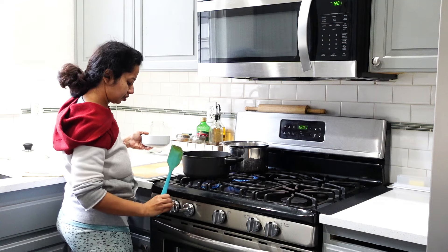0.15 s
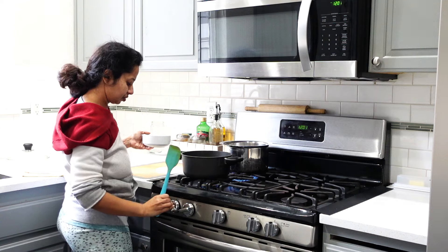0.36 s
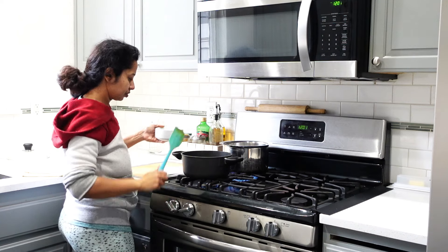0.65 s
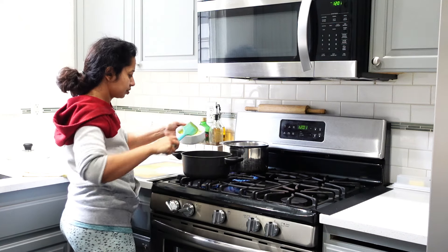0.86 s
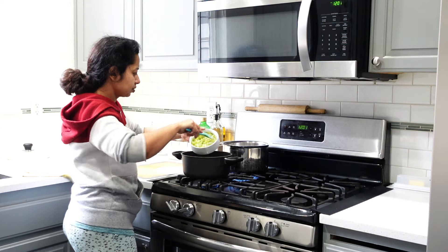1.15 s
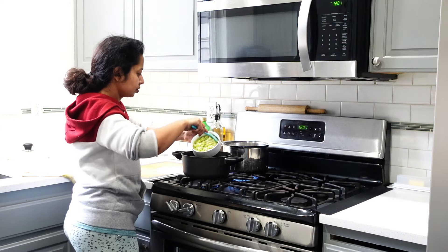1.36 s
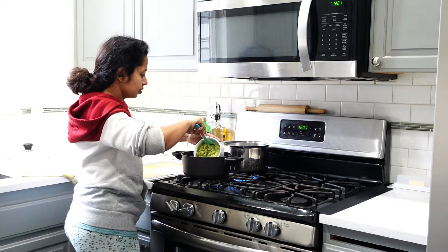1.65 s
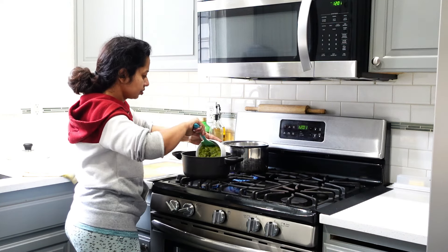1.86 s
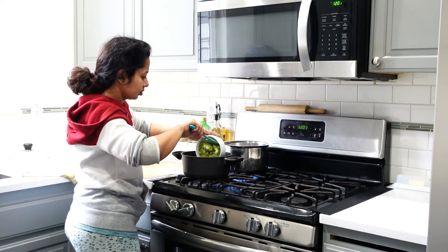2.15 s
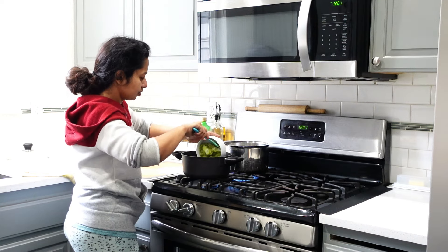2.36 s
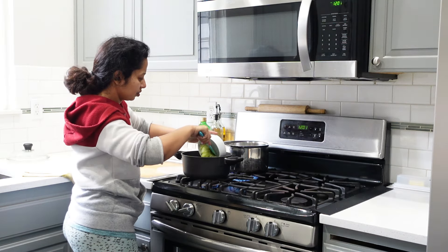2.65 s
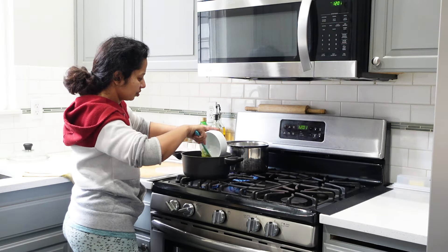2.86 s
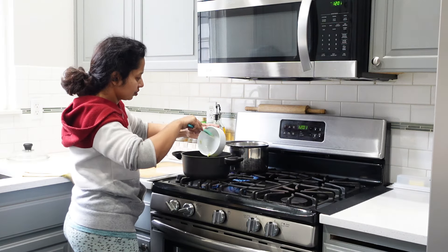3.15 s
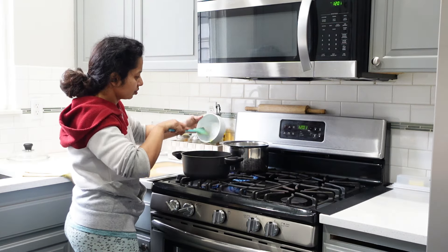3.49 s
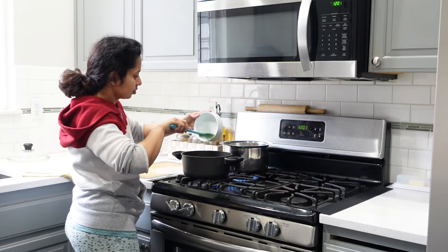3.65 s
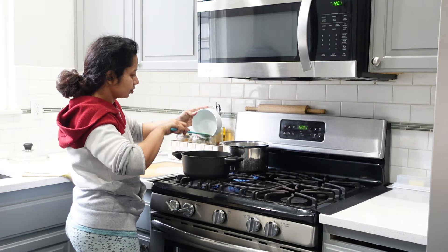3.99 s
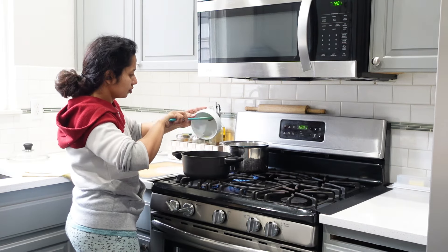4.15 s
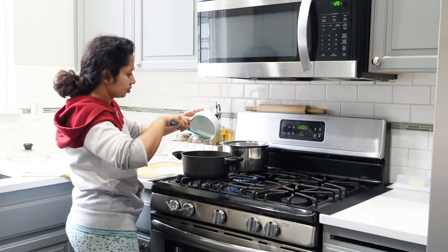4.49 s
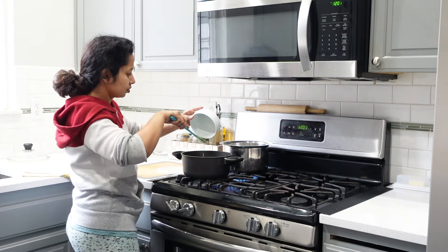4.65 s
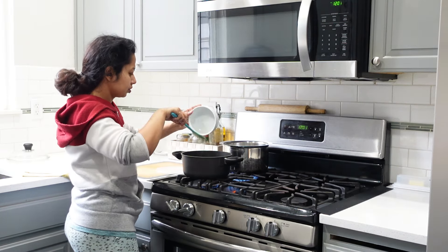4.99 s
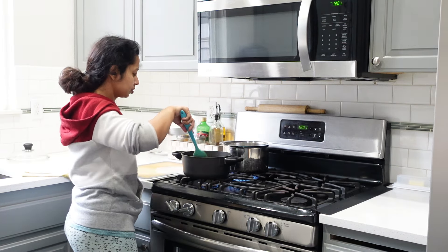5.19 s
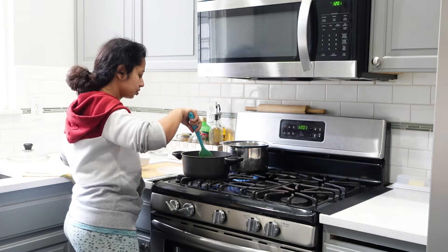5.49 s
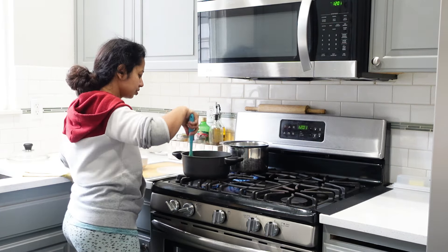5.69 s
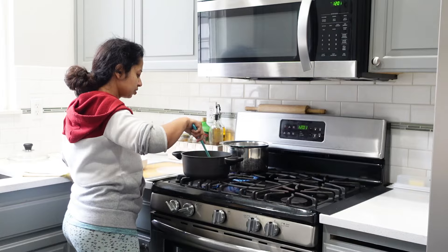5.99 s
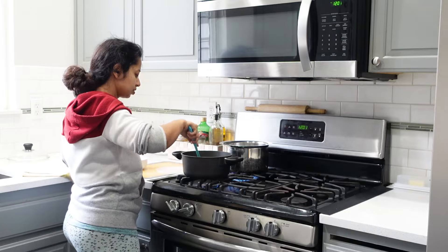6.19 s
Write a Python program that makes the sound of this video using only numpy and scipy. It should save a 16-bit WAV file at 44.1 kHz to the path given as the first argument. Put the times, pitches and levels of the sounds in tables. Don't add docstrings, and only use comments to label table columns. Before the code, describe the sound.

Vegetables fry in a deep pot, crackling brightly, then cutting suddenly to a softer, wetter hiss that grows lively under a spatula in a tiled kitchen.

```python
import sys
import numpy as np
from scipy import signal
from scipy.fft import rfft, irfft, next_fast_len
from scipy.io import wavfile
from scipy.ndimage import uniform_filter1d

SR = 44100
rng = np.random.default_rng(int(sys.argv[2]) if len(sys.argv) > 2 else 0)


def transcribe(signal):
    frames = np.atleast_2d(signal).T
    limited = np.clip(frames, -1, 1)
    pcm = np.round(limited * 32767).astype(np.int16)
    wavfile.write(sys.argv[1], SR, pcm)


def to_linear_factor(level_db):
    exponent = np.asarray(level_db, float) / 20
    return 10 ** exponent


N = 279241
CUT_S = 2.5645
CUT_SAMPLE = round(CUT_S * SR)
STEP = 40
CONTROL_SAMPLES = np.arange(N // STEP + 2) * STEP
CONTROL_S = CONTROL_SAMPLES / SR
AFTER_CUT = CONTROL_SAMPLES >= CUT_SAMPLE

# frequency in Hz, width in Hz, level over the hiss before the cut in dB,
# level over it after the cut in dB.
POT_MODES = [(704, 26, 5, 18.5), (853, 30, 0, 10), (935, 40, 2, 0), (1090, 90, 3, 0), (1230, 80, 0, 9),
             (1340, 65, 10, 12.5), (1555, 90, 3, 6), (1948, 110, -2, 7.5), (2150, 90, 3, 6),
             (2570, 70, 3, 6), (2930, 130, 7, 3), (3460, 80, 4, -1), (3885, 100, 4, 5), (4310, 120, 0, -1),
             (4725, 80, 5, 0), (5350, 90, 4, 0), (5670, 120, 5, 1), (6670, 90, 4, -3), (7560, 90, 5, 0),
             (8740, 150, 4, 0)]


def rms_one(x):
    return x / np.sqrt(np.mean(x ** 2) + 1e-20)


def in_time(rows):
    s, *columns = np.transpose(rows)
    return [np.interp(CONTROL_S, s, column) for column in columns]


def at_hz(points, hz):
    at, db = np.transpose(points)
    return np.interp(np.log(hz), np.log(at), db)


def gain_of(db):
    return np.interp(np.arange(N) / STEP, np.arange(len(db)), to_linear_factor(db))


def drift(rate_hz):
    r = np.exp(-2 * np.pi * STEP * rate_hz / SR)
    white = rng.standard_normal(N // STEP + 2002)
    return rms_one(signal.lfilter([1], [1, -2 * r, r * r], white)[2000:])


def resonance(x, hz, width_hz):
    r = np.exp(-np.pi * width_hz / SR)
    poles = [1, -2 * r * np.cos(2 * np.pi * hz / SR), r * r]
    return signal.lfilter([(1 - r * r) / 2, 0, (r * r - 1) / 2], poles, x)


def band_pass(x, low_hz, high_hz):
    return signal.sosfilt(signal.butter(2, [low_hz, high_hz], "band", fs=SR, output="sos"), x)


def high_pass(x, hz, order):
    return signal.sosfilt(signal.butter(order, hz, "high", fs=SR, output="sos"), x)


def kitchen(x, echo_db=10, lag=0):
    spot_lags = [-20, 21, 45, 62, 84]
    t60_s, spot_hold_s = 0.15, .12
    t = np.arange(SR // 3) / SR
    hold = round(spot_hold_s * SR)
    spot = np.repeat(rng.integers(len(spot_lags), size=len(x) // hold + 1), hold)[:len(x)]
    size = next_fast_len(len(x) + len(t))
    out = 0
    for k, spot_lag in enumerate(spot_lags):
        echoes = rng.standard_normal((2, len(t))) * to_linear_factor(-60 * t / t60_s)
        echoes *= to_linear_factor(echo_db) / np.sqrt(np.sum(echoes ** 2, axis=1, keepdims=True))
        echoes[0, max(spot_lag + lag, 0)] = 1
        echoes[1, max(-spot_lag - lag, 0)] = 1
        out = out + rfft(x * (spot == k), size) * rfft(echoes, size)
    return rms_one(irfft(out, size)[:, len(t):len(t) + N])


def pops(per_s, spread_db):
    n = N + SR // 3
    sizes = to_linear_factor(spread_db * np.minimum(rng.exponential(1, n), 5)) * rng.choice([-1, 1], n)
    return sizes * (rng.random(n) < per_s / SR)


def vigour():
    # time in seconds, vigour in dB, share of big slow bubbles in dB.
    sizzle = [
        (0.0, 3.5, 1),
        (0.16, 3.5, 9),
        (0.46, 4.5, -2.5),
        (1.05, 3.5, 0),
        (1.45, -1, 4),
        (2.14, 1, 2.5),
        (2.34, 3.5, -1.5),
        (2.56, 5.5, 0),
    ]
    # time in seconds, vigour in dB, share of big bubbles in dB.
    stirring = [(2.57, -26, -4), (2.6, -9, -11.5), (2.78, -7.5, -7), (2.93, -5.5, -0.5), (3.12, -0.5, 0.5),
                (3.51, 1, 1), (4.28, -0.5, 2.5), (5.32, -0.5, 0.5), (5.38, 3.5, -3), (5.65, 7, -3),
                (6.33, 9, 0.5)]
    levels = np.where(AFTER_CUT, in_time(stirring), in_time(sizzle))
    thin_mean = levels[:, ~AFTER_CUT].mean(axis=1)[:, None]
    wet_mean = levels[:, AFTER_CUT].mean(axis=1)[:, None]
    return levels - np.where(AFTER_CUT, wet_mean, thin_mean)


def hiss_level(hz, swells, thin_lift_db=0, wet_lift_db=0):
    # frequency in Hz, level per Hz in dB.
    thin = [(210, -48), (350, -9.5), (936, -4.5), (1680, -7), (2840, 1), (3120, 1), (5620, -0.5),
            (10400, -1.5), (15500, -9.5)]
    # frequency in Hz, level per Hz in dB.
    wet = [(210, -62), (350, -28), (600, -15), (760, -14), (1050, -7), (1500, -4), (2300, -0.5), (3500, 1),
           (6000, -1), (10000, -7.5), (15700, -19)]
    # frequency in Hz, share of vigour, share of big bubbles.
    follows = [(450, 1, 0.87), (1150, 0.76, 0.82), (4030, 0.95, 0.24), (10500, 1, 0.058)]
    at, *shares = np.transpose(follows)
    follow = np.array([np.interp(np.log(hz), np.log(at), share) for share in shares])
    colour_db = np.where(AFTER_CUT, at_hz(wet, hz) + wet_lift_db, at_hz(thin, hz) + thin_lift_db)
    return colour_db + follow @ swells


def singing(hz):
    # start in seconds, length in seconds, frequency in Hz, lift in dB.
    favoured = [(.9, 0.104, 410, 10), (1.131, 0.11, 440, 11), (2.02, 0.12, 12000, -15),
                (2.18, 0.086, 12200, -20), (2.382, 0.09, 13000, -15), (2.575, 0.296, 1340, 7),
                (2.7, .1, 1950, 5), (2.69, 0.11, 750, -11), (3.8, .5, 1950, 1.5), (5.9, .12, 590, 7),
                (5.18, .15, 706, 4.5), (5.05, 0.096, 760, -12), (4.15, 0.19, 4700, 4.5),
                (2.58, 0.24, 1480, -11), (2.2, .2, 720, -3), (2.44, 0.14, 1250, 5), (3.02, .2, 1800, -1),
                (2.2, 0.35, 2120, -5.5), (2.78, 0.29, 3330, 5.5), (2.955, .455, 1350, 8),
                (3.125, 0.41, 2930, 3), (3.14, 0.11, 2270, 5.5), (3.0, .25, 980, 9.5),
                (3.303, .11, 810, 10.5), (3.1, .2, 1680, 3.5), (3.682, 0.12, 1280, 5.5),
                (4, 0.13, 3000, 3.5), (4.052, 0.242, 3530, 1.5), (4.6, 0.13, 950, -26),
                (5.36, 0.28, 2110, 5), (5.55, 0.234, 1350, 7), (5.767, 0.15, 1000, 3),
                (6.05, 0.081, 2150, 3), (4.747, 0.47, 1300, 3.5), (5.62, 0.233, 1950, 3.5),
                (6.5, 0.17, 810, 10), (5.6, 0.34, 9200, 2.5), (5.7, 0.36, 14000, 3.5), (5.868, .1, 3300, 2),
                (6.028, 0.18, 2600, -6)]
    width_octaves, edge_s = 0.12, 0.014
    lift_db = 0
    for s, length_s, at, db in favoured:
        nearness = np.exp(-(np.log2(hz / at) / width_octaves) ** 2 / 2)
        to_edge_s = np.minimum(CONTROL_S - s, s + length_s - CONTROL_S)
        lift_db = lift_db + db * nearness * np.clip(to_edge_s / edge_s, 0, 1)
    return lift_db


def fizz(grains, swells, patchy_db, squeak_db):
    squeak_hold_s = .18
    band_slip = 400
    lone = kitchen(pops(80, 1.5), lag=9)
    patchy_db = np.where(AFTER_CUT, .8, 1.) * patchy_db
    together, near = drift(20.), drift(21.0)
    edges = 330 * 2 ** np.arange(0, 5.8, 1 / 6)
    out = 0
    for k, (low, high) in enumerate(zip(edges, edges[1:])):
        hz = np.sqrt(low * high)
        near = rms_one(1.4 * near + 0.31 * drift(39.0))
        own = 1.3 * drift(9.3)
        flicker_db = patchy_db * (0.3 * together + 0.65 * near + own)
        db = hiss_level(hz, swells) + 1.25 * singing(hz) + flicker_db
        band = band_pass(np.roll(grains, band_slip * (k % 3), axis=1), low, high)
        hold_count = round(N / SR / squeak_hold_s) + k % 5
        holds = np.array_split(np.roll(lone, rng.integers(N), axis=1), hold_count, axis=1)
        squeaks = [resonance(part, rng.uniform(low, high), 0.021 * hz) for part in holds]
        squeaks = rms_one(np.concatenate(squeaks, axis=1))
        band = band + to_linear_factor(squeak_db) * np.std(band) * squeaks
        out = out + gain_of(db) * band
    return out


def pot_air(thumps, swells):
    ring_db, wander_db = 0.5, 3.2
    out = 0
    for hz, width_hz, thin_db, wet_db in POT_MODES:
        db = hiss_level(hz, swells, thin_db, wet_db) + singing(hz)
        db = db + ring_db + wander_db * min(hz / 900, 1) * drift(11.)
        ring = resonance(resonance(thumps, hz, width_hz), hz, 2.5 * width_hz)
        height = np.sqrt(np.pi * width_hz / SR / 2) / np.std(ring, axis=1, keepdims=True) * np.sqrt(2)
        out = out + gain_of(db) * height * ring
    return out


def frying(patchy_db, scattered, squeak_db):
    thin_db, wet_db = -43, -39
    swells = vigour()
    spread = rms_one(np.array([pops(9000, 3.8)[:N], pops(9000, 2.1)[:N]]))
    spread = high_pass(spread, 5000, 1)
    grains = rms_one(kitchen(pops(3000, 4.0)) + scattered * spread)
    thumps = kitchen(pops(2500, 2.8), echo_db=0, lag=0) + .5 * spread[::-1, ::-1]
    out = fizz(grains, swells, patchy_db, squeak_db) + pot_air(thumps, swells)
    out = high_pass(out, 370, 4)
    before = to_linear_factor(thin_db) * rms_one(out[:, :CUT_SAMPLE])
    after = to_linear_factor(wet_db) * rms_one(out[:, CUT_SAMPLE:])
    return np.concatenate([before, after], axis=1)


def burner():
    # time in seconds, level in dB.
    flame = [(.22, -94), (.75, -99), (.85, -89), (1.05, -94), (1.25, -87.5), (1.5, -93), (2.05, -87),
             (2.17, -100), (2.4, -92.5), (3.2, -96.5), (3.9, -97.5), (4.06, -121), (4.21, -121),
             (4.27, -100), (5.5, -102), (5.62, -115), (5.75, -100), (6.33, -102)]
    # frequency in Hz, width in Hz, level in dB.
    colour = [(167, 11, -1), (192, 13.6, -1.5), (246, 29, -7), (301, 23, -5.5), (70, 58, -19),
              (440, 176, -13.5)]
    flicker_db, flickers_per_s = 2.5, 6.
    white = rng.standard_normal((2, N))
    murmur = sum(to_linear_factor(db) * resonance(resonance(white, hz, w), hz, 2 * w) for hz, w, db in colour)
    murmur = high_pass(murmur, 100, 1)
    return gain_of(in_time(flame)[0] + 16.5 + flicker_db * drift(flickers_per_s)) * rms_one(murmur)


def rumble():
    # frequency in Hz, width in Hz, level in dB.
    modes = [(53.3, 3.5, 8), (121.7, 8.6, 5), (200, 27, -9.5), (290, 116, -13.5), (840, 270, -23)]
    level_db, end_s = -42, .19
    white = rng.standard_normal(SR)
    n = round(end_s * SR)
    hum = 0
    for hz, w, db in modes:
        tone = resonance(resonance(white, hz, w), hz, 2 * w)[-n:]
        hum = hum + to_linear_factor(db) * np.sqrt(w) * rms_one(tone)
    return np.pad(to_linear_factor(level_db) * rms_one(hum), (0, N - n))


def spits(ring_db):
    # time in seconds, peak in dB, centre in Hz, half width in octaves, jet length in seconds.
    bursts = [(0.061, -37, 4000, 1, 0.0091), (0.166, -32, 6300, 0.95, 0.016),
              (0.179, -33, 5530, 0.44, 0.0096), (.2064, -34, 4970, .3, 0.0085),
              (0.269, -31.5, 6660, .2, 0.032), (0.335, -24, 7400, 0.87, 0.006),
              (0.385, -34.5, 7450, 0.31, 0.023), (0.475, -23.5, 4080, 0.67, .006),
              (0.552, -32, 7260, 0.19, 0.011), (0.638, -28, 7500, 0.31, 0.011),
              (0.653, -25, 6670, 0.99, 0.014), (0.774, -36.5, 3180, .25, .01), (0.805, -33, 7460, .18, .01),
              (0.854, -32, 5170, 0.84, 0.015), (0.898, -28, 6200, 0.96, 0.0087),
              (0.926, -28, 6400, 1, 0.019), (1.059, -29.5, 8260, 0.3, .006), (1.107, -35, 6080, 0.13, 0.01),
              (1.191, -32, 5900, 1, 0.012), (1.204, -26.5, 5440, 0.21, .011),
              (1.267, -37, 3910, 0.72, 0.0066), (1.322, -33, 4030, 0.59, 0.015),
              (1.328, -26, 5600, 0.15, 0.007), (1.357, -32, 3700, 1, 0.01),
              (1.461, -31, 10000, 0.95, 0.016), (1.502, -33.5, 8500, .8, 0.0087),
              (1.548, -37, 5600, .3, .008), (1.612, -31.5, 7500, 0.19, 0.0081),
              (1.656, -32.5, 6500, 1, 0.018), (1.687, -32.5, 5270, 1, 0.02), (1.929, -29, 5850, 0.2, 0.012),
              (1.973, -34.5, 8000, 1, 0.0092), (2.0328, -39, 5400, 0.64, 0.023),
              (2.097, -31.5, 5260, 0.74, .012), (2.124, -28.5, 9000, 0.65, 0.0053),
              (2.177, -33, 4130, 0.97, 0.009), (2.269, -31.5, 5900, 0.17, 0.0073),
              (2.319, -30.5, 7900, 0.47, 0.018), (2.375, -30, 5430, 0.5, 0.016),
              (2.545, -32.5, 3600, 0.65, 0.018),
              (1.862, -33, 4460, 1, .008), (2.5202, -38, 3080, 0.97, 0.015),
                (2.5854, -41.5, 6000, 0.95, 0.0083), (2.647, -41, 7500, 0.75, 0.015),
                (2.671, -42.5, 4560, 0.74, 0.0081), (2.709, -46, 8000, 0.73, 0.0091),
                (2.7644, -41.5, 10500, .3, 0.0073), (2.782, -43.5, 8800, .1, 0.011),
                (2.82, -35.5, 4130, 0.67, 0.00585), (2.846, -40, 3600, .4, 0.013),
                (2.887, -40, 3890, 0.47, .006), (2.98, -42, 11100, .4, .008),
                (3.0838, -34, 3690, 0.2, 0.015), (3.365, -34, 3300, 0.4, 0.013),
                (3.595, -35, 3800, 0.98, 0.011), (4.555, -43, 2970, 0.42, 0.009),
                (5.0272, -48, 1950, 0.26, 0.0101), (5.4445, -40, 2150, 0.4, 0.01),
                (5.5988, -27.5, 3400, 0.42, 0.0096), (5.7, -30.5, 3380, 0.37, 0.015),
                (5.814, -38, 11500, 0.6, 0.017), (5.872, -40, 1170, 0.98, 0.014),
                (5.895, -31.5, 2800, 0.52, .012), (6.1941, -31, 4540, 0.61, 0.009),
                (6.269, -27, 3600, 0.95, .018)]
    # time in seconds, peak in dB.
    cracks = [(0.0283, -34), (0.1121, -48), (0.1855, -33), (0.2184, -33), (0.2872, -29), (0.3376, -38),
              (0.4883, -42), (0.5382, -37), (0.5801, -38), (0.616, -39), (0.854, -39), (0.9313, -33),
              (1.036, -35), (1.1697, -36), (1.3229, -49), (1.3638, -40), (1.4227, -36), (1.465, -33),
              (1.4995, -37), (1.6072, -37), (1.6641, -39), (1.8073, -34), (1.9001, -46), (1.9759, -43),
              (2.1241, -40), (2.2578, -43), (2.3211, -40), (2.38, -37), (2.4573, -36), (2.5466, -40),
              (2.586, -46), (2.7651, -46), (2.9791, -44), (3.0894, -49), (3.1767, -46), (3.261, -45),
              (3.5588, -49), (3.7204, -42), (3.8013, -46), (3.9898, -47), (4.0282, -54), (4.122, -48),
              (4.2073, -39), (5.1652, -44), (5.8222, -29)]
    crack_hz, crack_octaves, crack_s, crack_db = 11500, 0.45, .007, -1
    alike, left_lag = 0.39, 45
    rise_share, fall_share = .85, .45
    tail_db, tail_t60_s = -6.5, 0.18
    jets = bursts + [(s, db + crack_db, crack_hz, crack_octaves, crack_s) for s, db in cracks]
    out = np.zeros((2, N + SR))
    t = np.arange(SR // 9) / SR
    for s, db, hz, octaves, length_s in jets:
        length_s = max(length_s, .002)
        white = rng.standard_normal((3, len(t)))
        white[0] = alike * np.roll(white[1], left_lag) + np.sqrt(1 - alike ** 2) * white[0]
        crackle = to_linear_factor(1.5 * rms_one(uniform_filter1d(white[2], size=120)))
        rise_s = rise_share * length_s
        late_s = np.maximum(t - rise_s - length_s, 0)
        collapse = np.exp(-late_s / (fall_share * length_s)) * (1 - to_linear_factor(tail_db))
        fall = collapse + to_linear_factor(tail_db - 60 * late_s / tail_t60_s)
        ratio = 2 ** np.clip(octaves, .08, 1.2)
        low, high = hz / ratio, hz * ratio
        top = min(high, 16000)
        jet = rms_one(band_pass(white[:2], low, top)) * crackle * np.minimum(t / rise_s, 1) * fall
        rings = [resonance(jet, mode_hz, 2 * w) for mode_hz, w, *_ in POT_MODES if low < mode_hz < high]
        jet = band_pass(jet + to_linear_factor(ring_db) * sum(rings), low, top)
        i = round((s - .6 * rise_s) * SR)
        heard = i / SR + t < CUT_S if s < CUT_S else 1
        out[:, i:i + len(t)] += to_linear_factor(db - 10.5) * jet * heard
    return out[:, :N]


def tick():
    # time in seconds, level in dB, frequency in Hz, T60 in seconds.
    touch = (5.264, -31, 3897, .045)
    s, db, hz, t60_s = touch
    t = np.maximum(np.arange(N) / SR - s, 0)
    return to_linear_factor(db - 60 * t / t60_s) * np.minimum(t / 0.0023, 1) * np.sin(2 * np.pi * hz * t)


def scene():
    pot = frying(patchy_db=2.0, scattered=0.69, squeak_db=-2.0) + spits(ring_db=-1.0) + tick()
    return pot * to_linear_factor([[-.6], [.6]]) + burner() + rumble()


def top_cut(x):
    return signal.sosfilt(signal.butter(12, 15760, fs=SR, output="sos"), x)


def record(dry):
    hiss_db = -60.5
    hiss = to_linear_factor(hiss_db) * rms_one(np.diff(rng.standard_normal((2, N + 1)), axis=1))
    return top_cut(dry + hiss)


dry = scene()
out = record(dry)
transcribe(out)
```